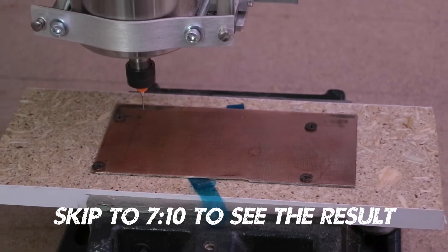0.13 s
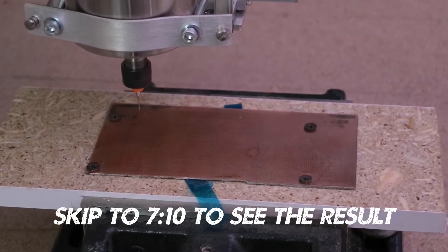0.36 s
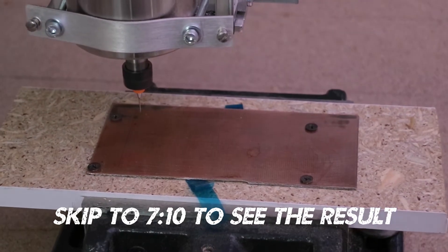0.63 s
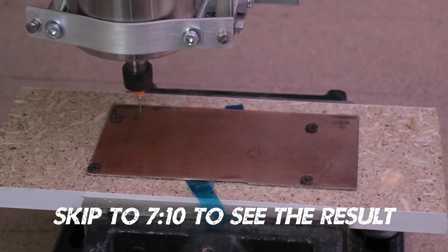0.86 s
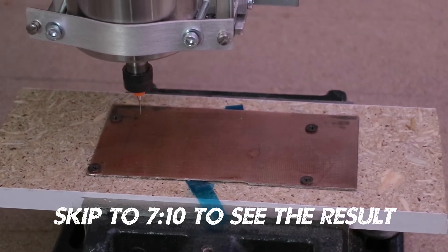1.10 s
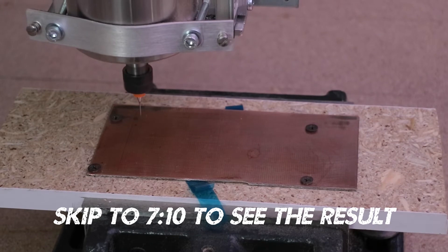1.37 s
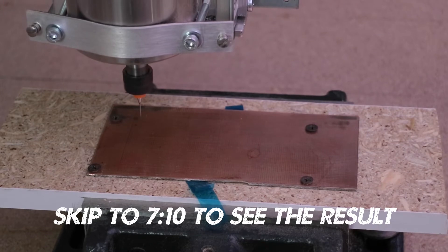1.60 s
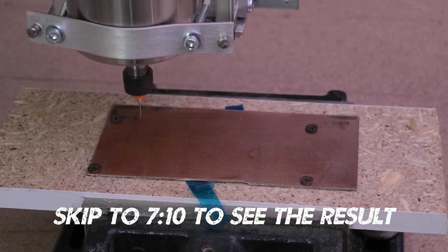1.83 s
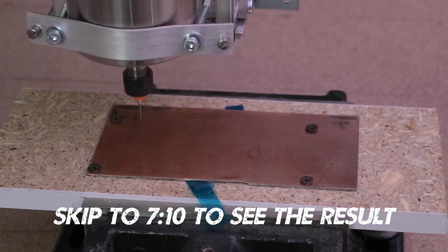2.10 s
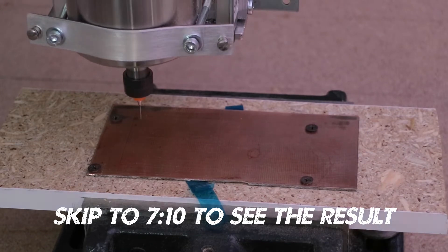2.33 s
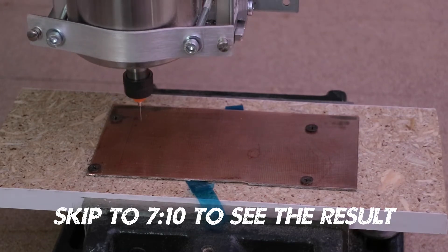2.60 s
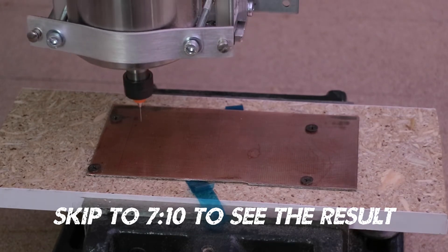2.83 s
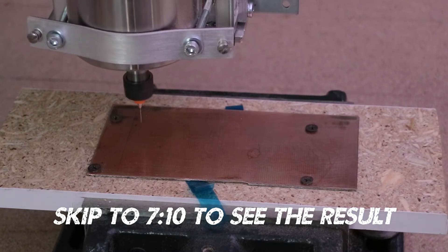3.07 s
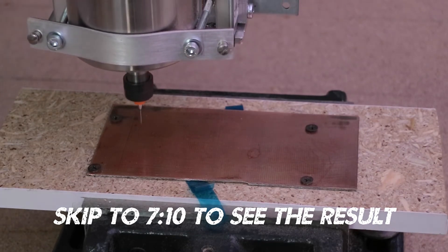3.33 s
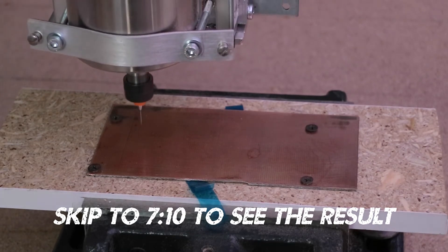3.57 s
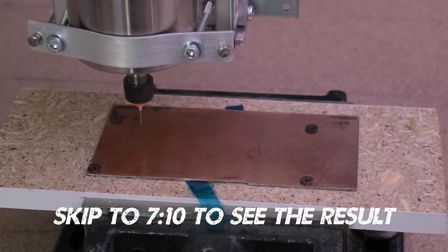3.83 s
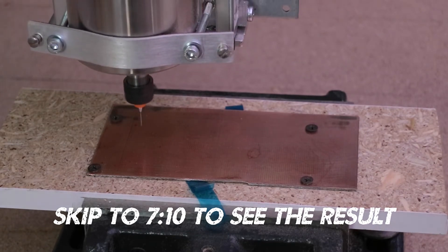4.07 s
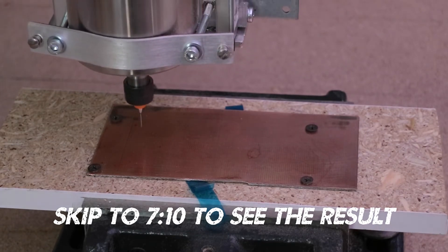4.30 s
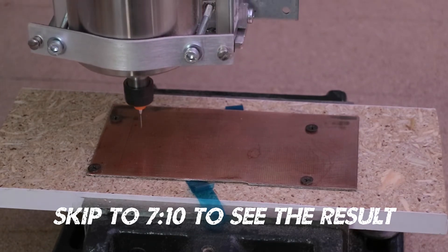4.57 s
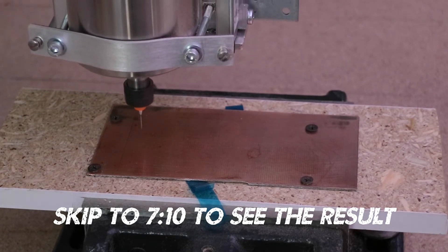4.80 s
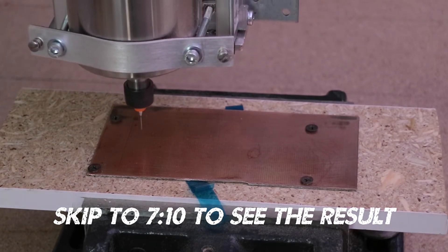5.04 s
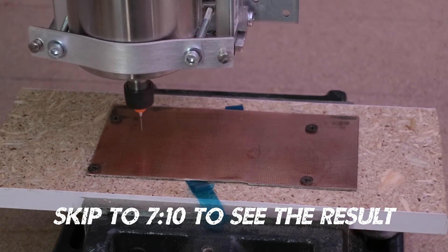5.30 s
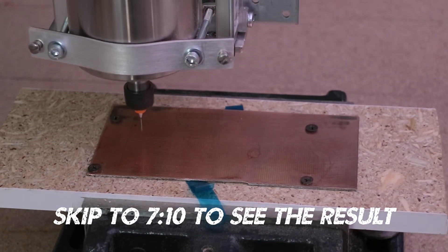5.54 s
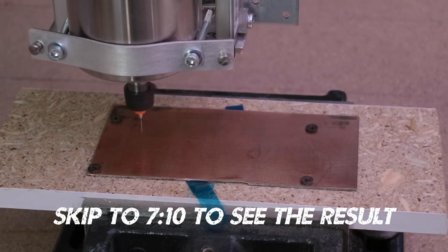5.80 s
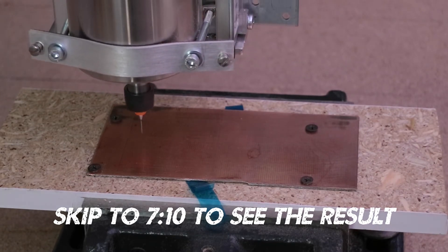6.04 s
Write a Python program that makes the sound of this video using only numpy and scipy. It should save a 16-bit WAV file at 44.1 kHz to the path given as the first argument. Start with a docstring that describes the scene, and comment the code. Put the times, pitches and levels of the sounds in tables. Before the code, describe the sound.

A small spindle motor is already running, sliding up the last bit to speed at once, then whining continuously, high and piercing. Its pitch dips slightly, climbs to a peak near the middle and sinks again, beating against steady motor and fan tones. Breathy bearing and air hiss surrounds it. Two soft dull thuds and a faint rising whistle come early. Close stereo pickup in a workshop, stronger on the left.

```python
"""A small high-speed spindle slides up to speed and whines over a board in a workshop; its speed then
sags, swells and sags again. From the start its sines move together, their mirror images below the drive's
switching tone move the other way, and steady motor and fan sines beat against them. Filtered noise makes
the air and bearing hiss that rings in the frame, and the faint rumble. Soft noise thuds come at about
0.4 s and 1.6 s; from 1 s to 2.6 s a faint wavering sine whistles, climbs and levels off."""
import sys
import numpy as np
from scipy import signal
from scipy.fft import rfft, irfft, next_fast_len
from scipy.io import wavfile

SR = 44100
rng = np.random.default_rng(int(sys.argv[2]) if len(sys.argv) > 2 else 0)


def materialize(psi):
    """Save the field psi as 16-bit PCM at rate SR to the path in sys.argv[1].

    A 1-D psi becomes a single channel; in a 2-D psi each row is a channel.
    """
    bounded = np.clip(np.atleast_2d(psi).T, -1, 1)
    quanta = np.round(bounded * 32767).astype(np.int16)
    wavfile.write(sys.argv[1], SR, quanta)


def how_loud(loudness_db):
    """Turn decibels into a plain amplitude multiplier (0 dB gives 1, 20 dB gives 10)."""
    steps = np.asarray(loudness_db, float) / 20
    return 10 ** steps


N = 271605

# Spindle speed as the pitch of its low tone, with the whine at the near (left) microphone before it wavers.
# Each row: time in seconds, low tone in Hz, left level in dB.
SPEED = [(0.1, 1099.2, -35.6), (0.4, 1098.8, -36.4), (0.7, 1094.7, -37.0), (0.95, 1095.8, -36.2),
         (1.2, 1101.3, -34.9), (1.5, 1106.1, -38.0), (1.8, 1112.8, -39.4), (2.1, 1123.1, -38.1),
         (2.3, 1129.0, -41.8), (2.5, 1134.0, -39.0), (2.7, 1136.3, -39.9), (2.9, 1135.9, -40.1),
         (3.1, 1134.7, -39.1), (3.35, 1131.3, -40.2), (3.6, 1128.9, -45.7), (3.9, 1123.5, -43.8),
         (4.15, 1119.1, -41.5), (4.4, 1113.3, -50.0), (4.8, 1109.0, -49.7), (5.05, 1106.6, -41.2),
         (5.3, 1104.3, -36.0), (5.7, 1100.7, -36.5), (6.15, 1093.8, -35.7)]
# The spindle sliding up to speed. Each row: time in seconds, pitch ratio.
SPEED_UP = [(0, 0.97), (.03, 0.986), (.065, 1.0)]
# The whine at the far (right) microphone: the room favours some pitches and cancels others.
# Each row: whine in Hz, right level in dB at mid-scene before it wavers, left phase lead in radians.
WHINE_RIGHT = [(4385, -42, -1.4), (4396, -40.5, -1.1), (4415, -45.5, -1.0), (4427, -48.5, -.5),
               (4436, -56, 1.5), (4446, -50.5, 3), (4458, -49, 3.7), (4475, -51, 4), (4487, -48.5, 4.1),
               (4503, -54, 3.3), (4527, -48.5, 3.1), (4556, -46, 2.7)]
# Low spindle tone that beats with the steady motor tone.
# Each row: pitch in Hz, left level in dB at mid-scene, right level in dB, left phase lead in radians.
LOW_TONE = [(1095, -55, -55.5, -1.7), (1103, -53.5, -54.7, -1.8), (1110, -51.5, -54.3, -1.9),
            (1116, -52, -53.8, -2.1), (1121, -56, -52.4, -2.4), (1125, -65, -52.5, -1.2),
            (1130, -55.5, -51.7, -.1), (1134, -49, -50.5, -.1), (1136.5, -46, -49.7, 0)]
# Strongest mirror tone, the switching rate minus 2.5 whines.
# Each row: pitch in Hz, left and right level in dB at mid-scene, left phase lead in radians.
MIRROR = [(3940, -59, -70, -1.5), (3995, -68, -60, .8), (4035, -68, -66, 2.5), (4075, -62, -64, 1.8),
          (4160, -52.5, -68, .3), (4215, -49, -66, -.2), (4260, -47, -58, -2), (4295, -54, -52, -2),
          (4340, -52, -51.5, -1), (4365, -54, -51, -1.5)]
# Two close pairs of tones that throb: lower and upper of the low pair, then of the high pair.
# Each entry: multiple of the low tone.
PAIR_RATIOS = [3.604, 3.6285, 9.1, 9.1365]
# The low pair by speed. Each row: whine in Hz, lower tone's left and right level in dB,
# upper tone's left and right level in dB.
LOW_PAIR = [(4390, -65, -69, -62, -63), (4412, -60.5, -65, -61, -62.5), (4430, -60, -62.5, -60, -59),
            (4455, -58, -60, -59.5, -60.5), (4490, -60, -64, -61, -62), (4512, -63, -62, -59, -63),
            (4540, -53, -57, -51, -57), (4556, -52, -57, -50.5, -58)]
# The high pair by speed. Each row: whine in Hz, lower tone's left level in dB, upper tone's left level in dB.
HIGH_PAIR = [(4390, -66, -70), (4412, -66, -71), (4428, -62.5, -64), (4455, -62.5, -65.5),
             (4490, -64.5, -65), (4512, -65.5, -70.5), (4535, -61, -65), (4550, -70.5, -60)]
# Weaker spindle tones. Each row: multiple of the whine, mean left level in dB, mean right level in dB.
WHINE_ORDERS = [(.5, -64, -70.5), (.75, -73, -74.5), (1.25, -81, -80), (1.5, -76, -82), (2, -76, -76)]
# Thin tones, perhaps of the bearings. Each row: multiple of the low tone, mean left and right level in dB.
BEARING_TONES = [(6.39, -78, -73), (7.216, -77, -79), (7.617, -84.5, -86.5), (9.742, -74, -79),
                 (9.9, -74, -79), (9.943, -68.5, -74), (11.742, -67, -70)]
# Weaker mirror tones. Each row: whines below the switching rate, mean left and right level in dB.
SIDEBANDS = [(.25, -76, -87), (.5, -73, -79), (1, -76, -81), (1.5, -72, -74.5), (2.25, -86, -94)]
# A steep mirror tone. Each row: low tones below twice the switching rate, mean left and right level in dB.
SECOND_SIDEBANDS = [(19, -74, -78)]

# Steady motor and fan tones. Each row: pitch in Hz, mean left and right level in dB,
# left phase lead in radians.
STEADY = [(341.38, -86.7, -84.3, -2.6), (1024.13, -64.8, -74.6, 1.8), (1113.25, -53.2, -63.2, 3.1),
          (1138.36, -48.8, -52.9, -0.1), (1155.12, -59.3, -66.3, 2.0), (2226.18, -63.8, -72.1, -1.4),
          (2276.69, -65.8, -70.2, -1.2), (2309.98, -59.4, -74.2, -0.6), (2588.86, -69.4, -79.8, 2.9),
          (3415.12, -69.8, -72.6, 0.1), (3464.36, -72.5, -81.9, 3.1), (5691.96, -77.5, -80.4, -0.5),
          (7968.63, -78.3, -80.1, 0.3), (9107.01, -80.7, -80.9, 0.3), (11383.8, -70.6, -73.4, -0.0),
          (12522.1, -78.4, -80.1, 0.1), (13660.5, -77.0, -79.8, 0.2), (14798.9, -81.0, -80.8, 0.0),
          (15329.7, -81.0, -78.9, -0.2)]
# A wandering fan tone. Each row: time in seconds, pitch in Hz.
FAN_PITCH = [(0.1, 1405), (1.25, 1397), (2.15, 1406), (2.72, 1397), (2.89, 1403), (4.09, 1389),
             (5.26, 1400), (6.1, 1400)]
# Its harmonics. Each row: multiple of the fan pitch, mean left and right level in dB,
# left phase lead in radians.
FAN_TONES = [(1, -61, -75.5, 3.0), (2, -57, -65, 1.8)]
# A twin fan that beats against it. One row: pitch in Hz, wander in Hz, mean left and right level in dB.
TWIN_FAN = (2808, 5.0, -62.5, -70.5)

# Colour of the hiss ahead of the frame. Each row: frequency in Hz, relative level in dB per Hz.
HISS_SPECTRUM = [(24, -91), (40, -63), (450, -35.5), (741, -21.5), (951, -19.5), (1130, -11), (1250, -18),
                 (1530, -13.5), (2060, -18.5), (2850, -18.5), (3070, -24.5), (4360, -20.5), (5900, -29),
                 (10400, -28), (15600, -27.5)]
# Frame resonances that the hiss rings in. Each row: centre in Hz, width in Hz, lift in dB taken alone.
FRAME = [(165, 27, 4), (260, 36, 3.5), (472, 86, 4), (578, 30, 8), (642, 14, 9), (743, 59, 10.5),
         (890, 50, 4), (1490, 120, 4), (1562, 30, 11.5), (1626, 36, 4), (1850, 104, 8), (2290, 230, 2.5),
         (2840, 165, 3.5), (3380, 130, 4), (4427, 330, 12.3), (4540, 120, 5), (4740, 150, 7.5),
         (5630, 150, 4), (6320, 120, 2.5), (6680, 130, 3), (7100, 200, 4.5), (8600, 400, 3.5),
         (10270, 560, 10), (11600, 300, 3), (12250, 120, 5), (12600, 300, 4.5), (14800, 200, 3)]
# Stereo balance of the hiss. Each row: frequency in Hz, left gain minus right gain in dB.
BALANCE = [(60, -1.5), (270, -.5), (450, 1), (740, 6), (1220, 2.5), (2000, 5.5), (5000, 6.5), (9000, 3),
           (15000, 2)]
# Delay between the sides in the hiss. Each row: frequency in Hz, left phase lead in radians.
HISS_LEAD = [(0, 0), (690, 1.7), (1210, .7), (1890, 2.6), (2500, 8.5), (3700, 13.9), (4570, 10),
             (5400, 12.57), (16000, 12.57)]
# How much of the hiss both sides share. Each row: frequency in Hz, left-right likeness from 0 to 1.
LIKENESS = [(60, .72), (500, 0.79), (2000, 0.48), (5500, 0.34), (7000, 0.89), (15000, 0.97)]
# Bands of the hiss that swell and fade. Each row: low edge in Hz, high edge in Hz,
# early extra in dB, swing in dB rms, swing bandwidth in Hz.
SWELLING = [(60, 450, 2.0, 2.0, 5.0), (1510, 1610, 2.0, 2.2, 9.0), (4600, 5800, 0, 1.0, 1.0),
            (9700, 10700, 1.5, 1.5, 1.5), (11300, 15000, 3.0, .5, .5)]

# Soft bumps through the bench. Each row: time in seconds (0.03 s ahead of the peak),
# level in dB ahead of the thuds' trim.
THUDS = [(.39, -74), (1.61, -66)]
# A faint rough whistle. One row: start in seconds, length in seconds, starting pitch in Hz,
# pitch it climbs towards in Hz, level in dB at its fullest before it wavers.
WHISTLE = (1.0, 1.6, 2575, 2725, -68)


def rms_one(x):
    """Scale to rms 1."""
    return x / np.sqrt(np.mean(x ** 2) + 1e-20)


def in_time(rows):
    """Read the columns of a timed curve at every sample."""
    seconds, *columns = np.transpose(rows)
    return [np.interp(np.arange(N) / SR, seconds, column) for column in columns]


def by_pitch(rows, hz):
    """Read the columns of a table at the pitch of the moment."""
    at, *columns = np.transpose(rows)
    return [np.interp(hz, at, column) for column in columns]


def at_hz(points, hz):
    """Read a spectrum on a log frequency axis."""
    at, value = np.transpose(points)
    return np.interp(np.log(hz), np.log(at), value)


def drift(rate):
    """Slow random wander of rms 1: noise through two equal low-pass poles at rate Hz."""
    pole = np.exp(-200 * np.pi * rate / SR)  # runs at one point per 100 samples
    points = rng.standard_normal(N // 100 + 1002)
    slow = signal.lfilter([1], [1, -2 * pole, pole * pole], points)[1000:]
    return np.interp(np.arange(N) / 100, np.arange(len(slow)), rms_one(slow))


def turning(hz):
    """Running phase in radians of a tone of this pitch."""
    return 2 * np.pi * np.cumsum(hz) / SR


def tone(phase, left_db, right_db, lead=0):
    """One sine at both microphones, levels in dB rms, the left ahead by lead radians."""
    left = how_loud(left_db) * np.cos(phase + lead)
    right = how_loud(right_db) * np.cos(phase)
    return np.sqrt(2) * np.array([left, right])


def wavering(rate, depth_db, wobble):
    """Independent wanders of level in dB and of phase in radians, as an uneven source gives."""
    return depth_db * drift(rate), wobble * drift(rate)


def band(x, low_hz, high_hz):
    """Keep what lies between two frequencies."""
    return signal.sosfilt(signal.butter(2, [low_hz, high_hz], "band", fs=SR, output="sos"), x)


def throbbing_pairs(rotor, whine_hz):
    """Two pairs of tones locked to the rotor, each pair so close in pitch that it beats."""
    low_a_left, low_a_right, low_b_left, low_b_right = by_pitch(LOW_PAIR, whine_hz)
    high_a_left, high_b_left = by_pitch(HIGH_PAIR, whine_hz)
    high_side_db = 4.5  # the high pair is this much weaker on the right
    levels = [(low_a_left, low_a_right, .4), (low_b_left, low_b_right, .6),
              (high_a_left, high_a_left - high_side_db, 0), (high_b_left, high_b_left - high_side_db, 0)]
    return sum(tone(ratio * rotor, *level) for ratio, level in zip(PAIR_RATIOS, levels))


def spindle():
    """Sines locked to the speed, and mirrors whose pitch falls as it rises; also returns the shaft angle."""
    t = np.arange(N) / SR
    from_middle = t - t.mean()
    low_hz, left_db = in_time(SPEED)
    # the whine runs above 4 low tones by 9.36 Hz, plus 14.84 Hz that dies away over about 1 s
    whine_hz = 4 * low_hz + 9.36 + 14.84 * np.exp(-t / 1.0)
    lag = turning(1 - in_time(SPEED_UP)[0])
    lag = lag[-1] - lag  # phase per Hz still to be lost to the slide up to speed
    whine = turning(whine_hz) + whine_hz * lag
    rotor = turning(low_hz) + low_hz * lag
    switching_hz = 15330
    switching = turning(np.full(N, switching_hz))

    right_db, lead = by_pitch(WHINE_RIGHT, whine_hz)
    right_db = right_db - .6 * from_middle  # fades by 0.6 dB per second
    db, wobble = wavering(28, depth_db=0.89, wobble=.08)
    db = db + .6 * drift(8.0)
    out = tone(whine + wobble, left_db + db, right_db + db, lead)

    low_left_db, low_right_db, low_lead = by_pitch(LOW_TONE, low_hz)
    low_left_db = low_left_db - .6 * from_middle  # fades by 0.6 dB per second
    out += tone(rotor + .87, low_left_db, low_right_db, low_lead)  # starting phase in radians

    # thin top whistle, 14 times the low tone
    db, wobble = wavering(3.0, depth_db=1.5, wobble=.8)
    out += tone(14 * rotor + wobble, -68.5 + db, -69.5 + db)

    whines_below = 2.5
    growth = how_loud(1.2 * from_middle)  # the mirror tone gains 1.2 dB per second
    mirror_levels = by_pitch(MIRROR, switching_hz - whines_below * whine_hz)
    out += growth * tone(switching - whines_below * whine, *mirror_levels)

    out += throbbing_pairs(rotor, whine_hz)

    families = [(0, whine, WHINE_ORDERS), (0, rotor, BEARING_TONES),
                (switching, -whine, SIDEBANDS), (2 * switching, -rotor, SECOND_SIDEBANDS)]
    for start, turn, rows in families:
        for multiple, tone_left_db, tone_right_db in rows:
            db, wobble = wavering(2.7, depth_db=2.5, wobble=1.5)
            phase = start + multiple * turn + wobble
            out += tone(phase, tone_left_db + db, tone_right_db + db)
    return out, whine / 10  # ten whine cycles to a turn


def motors():
    """Motor and fan sines: steady ones waver more the higher they lie, two fans wander and beat."""
    out = np.zeros((2, N))
    for hz, left_db, right_db, lead in STEADY:
        db, wobble = wavering(1.26, depth_db=.4 * hz / 2000, wobble=.1 * hz / 1000)
        out += tone(turning(np.full(N, hz)) + wobble, left_db + db, right_db + db, lead)
    fan = turning(in_time(FAN_PITCH)[0])
    for multiple, left_db, right_db, lead in FAN_TONES:
        db, wobble = wavering(6.0, depth_db=1.1 * multiple, wobble=.15 * multiple)
        out += tone(multiple * fan + wobble, left_db + db, right_db + db, lead)
    hz, wander_hz, left_db, right_db = TWIN_FAN
    db = 3.0 * drift(3.0)
    twin = turning(hz + wander_hz * drift(.8))
    out += tone(twin, left_db + db, right_db + db, 1.8)
    return out


def hiss(shaft):
    """Air and bearing noise coloured by frame resonances; the treble flutters once a turn."""
    size = next_fast_len(N)
    hz = np.maximum(np.arange(size // 2 + 1) * SR / size, 1)
    lift = sum((how_loud(db) - 1) / np.sqrt(1 + (2 * (hz - centre) / width) ** 4)
               for centre, width, db in FRAME)
    shape = how_loud(at_hz(HISS_SPECTRUM, hz)) * (1 + lift)

    # the right side mixes the shared noise, turned in phase, with noise of its own
    common, own = rfft(rng.standard_normal((2, size)))
    alike = np.clip(at_hz(LIKENESS, hz), 0, 1)
    lead = np.interp(hz, *np.transpose(HISS_LEAD))
    right = alike * common * np.exp(-1j * lead) + np.sqrt(1 - alike ** 2) * own
    side = how_loud(at_hz(BALANCE, hz) / 2)
    spectrum = shape * np.array([common * side, right / side])
    both = rms_one(irfft(spectrum, size)[:, :N])

    treble = signal.sosfilt(signal.butter(2, 6000, "high", fs=SR, output="sos"), both)
    flutter = .25 * np.cos(shaft) + .06 * drift(5) + .07 * drift(30)
    settling = np.exp(-np.arange(N) / SR / 2.5)  # the early extra dies away over about 2.5 s
    for low_hz, high_hz, early_db, swing_db, rate in SWELLING:
        db = early_db * settling + swing_db * drift(rate)
        both = both + (how_loud(db) - 1) * band(both, low_hz, high_hz)
    level = how_loud(-47.5)  # ahead of this, the noise had rms 1 before swelling and flutter
    return level * (both * how_loud(.5 * drift(3)) + treble * flutter)


def rumble():
    """Faint lumpy room rumble: low-passed noise mostly shared by both sides, its level wandering."""
    common, left, right = band(rng.standard_normal((3, N)), 20, 130)
    both = common * [[.9], [1.1]] + .45 * np.array([left, right])
    return how_loud(-103 + 4.5 * drift(4)) * rms_one(both)


def thuds():
    """Bumps through the bench as short dull puffs of noise, each under a bell-shaped swell."""
    t = np.arange(N) / SR
    swell = np.zeros(N)
    for seconds, db in THUDS:
        swell += how_loud(db) * np.exp(-((t - seconds - .03) / 0.029) ** 2)
    dull = band(rng.standard_normal(N), 300, 500)
    return swell * rms_one(dull) * .6  # trim


def whistle():
    """A breathy line, one sine rough in level and phase, that fades in, climbs and fades out."""
    start, length, from_hz, to_hz, level_db = WHISTLE
    age = np.clip(np.arange(N) / SR - start, 0, length)
    hz = to_hz + (from_hz - to_hz) * np.exp(-age / .5)  # climb's time constant in seconds
    db, wobble = wavering(12.0, depth_db=3.0, wobble=1.2)
    swell = np.sqrt(np.abs(np.sin(np.pi * age / length)))
    return swell * tone(turning(hz) + wobble, level_db + db, level_db + db)


def scene():
    """Mix all sources at two microphones."""
    tones, shaft = spindle()
    return tones + motors() + hiss(shaft) + rumble() + thuds() + whistle()


def roll_off(x):
    """The treble ends steeply here."""
    return signal.sosfilt(signal.butter(12, 15750, fs=SR, output="sos"), x)


def record(dry):
    """Fade in briefly from 0.55 of full gain, and fade out over the last 4 ms."""
    t = np.arange(N) / SR
    fade = np.minimum(.55 + t / .09, 1)
    fade *= np.minimum(t[::-1] / .004, 1)
    return roll_off(dry * fade)


dry = scene()
out = record(dry)
materialize(out)
```